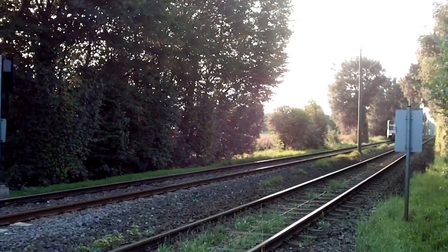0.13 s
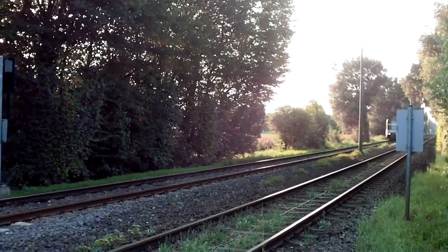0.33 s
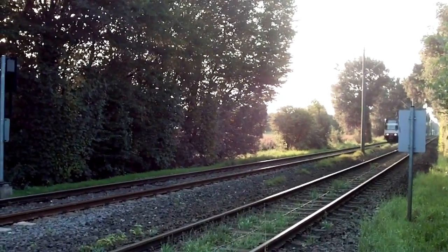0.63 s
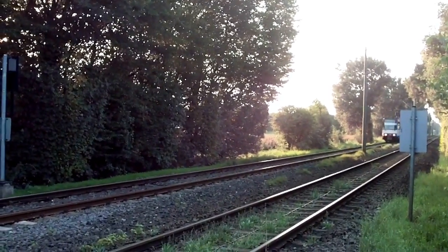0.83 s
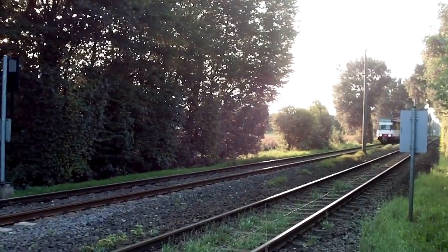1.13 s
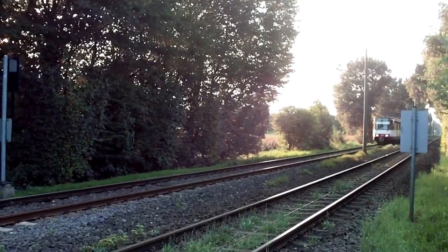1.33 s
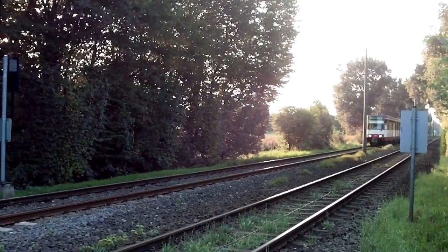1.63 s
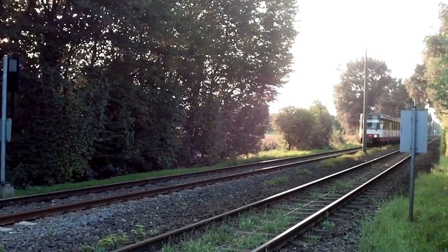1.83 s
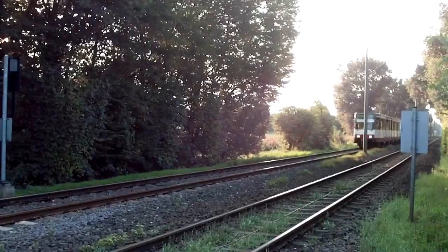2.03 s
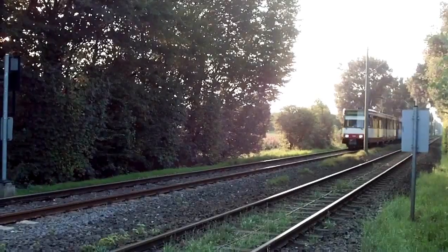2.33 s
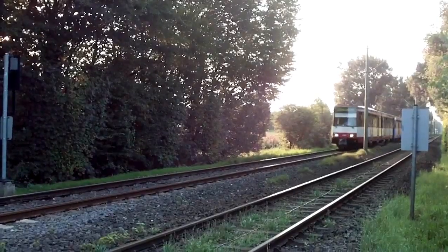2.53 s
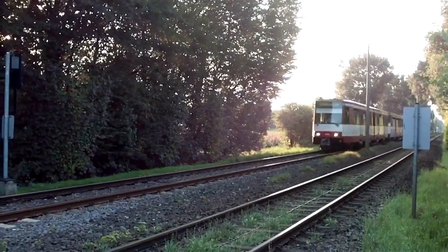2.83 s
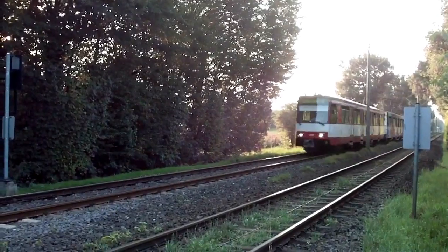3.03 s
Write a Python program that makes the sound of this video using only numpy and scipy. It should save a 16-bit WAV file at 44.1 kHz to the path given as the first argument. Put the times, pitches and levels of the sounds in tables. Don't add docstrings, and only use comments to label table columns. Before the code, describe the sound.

A light rail train approaches, never passing. From 0 to 1 s its rolling is faint over deep ground rumble, a distant engine's low idling hum and soft leafy air, with a short low boom near 0.4 s. From 1.2 s wheel roar, ringing and fluttering rail song rise quickly; a softer boom and tiny bird chirp come near 1.9 s. Overhead-wire hiss brightens, loudest at 3.2 s.

```python
import sys
import numpy as np
from scipy import signal
from scipy.fft import rfft, irfft, next_fast_len
from scipy.io import wavfile
from scipy.ndimage import uniform_filter1d

SR = 44100
rng = np.random.default_rng(int(sys.argv[2]) if len(sys.argv) > 2 else 0)


def persist_wave(psi):
    counts = np.round(np.clip(psi, -1, 1) * 32767).astype(np.int16)
    wavfile.write(sys.argv[1], SR, np.atleast_2d(counts).T)


def boost(x):
    u = np.asarray(x, float) / 20
    return 10 ** u


N = 140238


def rms_one(x):
    return x / np.sqrt(np.mean(x ** 2) + 1e-20)


def in_time(rows):
    times, values = np.transpose(rows)
    return np.interp(np.arange(N) / SR, times, values)


def swing_of(db):
    return db - db.mean()


def drift(rate_hz):
    step = 40
    r = np.exp(-2 * np.pi * rate_hz * step / SR)
    raw = rng.standard_normal(N // step + 2002)
    slow = signal.lfilter([1], [1, -2 * r, r * r], raw)[2000:]
    return np.interp(np.arange(N) / step, np.arange(len(slow)), rms_one(slow - slow.mean()))


def band(low_hz, high_hz, order):
    sos = signal.butter(order, [low_hz, high_hz], "band", fs=SR, output="sos")
    noise = rng.standard_normal(N + SR // 4)
    return rms_one(signal.sosfilt(sos, noise)[-N:])


def ring(hz, width_hz):
    return band(hz - width_hz / 2, hz + width_hz / 2, order=1)


def coloured(spectrum, patchy_db, rate_hz=6.0):
    hz, db = np.transpose(spectrum)
    knots = np.log(hz)
    size = next_fast_len(N)
    at = np.log(np.arange(size // 2 + 1) * SR / size + 1e-9)
    beyond = np.maximum(knots[0] - at, 0) + np.maximum(at - knots[-1], 0)
    gain = boost(np.interp(at, knots, db) - 40 * beyond)
    shaped = rfft(rng.standard_normal(size)) * gain
    centres = np.linspace(knots[0], knots[-1], 8)
    shared = drift(8)
    total = 0
    for one in np.eye(8):
        part = irfft(shaped * np.interp(at, centres, one), size)[:N]
        total = total + part * boost(patchy_db * (0.56 * shared + drift(rate_hz)))
    return rms_one(total)


# t/s, level/dB
NEARNESS = [
    (0, -42.5),
    (.5, -41.5),
    (1, -40.5),
    (1.5, -37),
    (2, -36),
    (2.4, -32.5),
    (2.8, -30.5),
    (3, -30),
    (3.12, -28.5),
    (3.18, -28.5),
]


def nearness():
    return in_time(NEARNESS)


# f/Hz, level/dB (per Hz)
ROAR = [(90, 3.5), (250, -13), (380, -15), (700, -7), (1500, -7.5), (2100, -13), (2900, -16), (3700, -23.5)]
# low f/Hz, high f/Hz, level/dB (over nearness), share of its swing
PASS_BANDS = [(507, 659, -8.5, 1.22), (648, 746, -11, 1.44), (782, 860, -15.5, 1.05),
              (861, 1010, -4.5, 0.91), (1002, 1154, -4, 0.91), (1206, 1290, -10.5, 0.89),
              (1938, 2170, -19.5, 1.12)]
# f/Hz, width f/Hz, level/dB (over nearness), share of its swing
WHEEL_RINGS = [(587, 30, -15, 1.1), (937, 25, -13, 1.45), (1010, 50, -15, 1.75), (1128, 30, -14, 1.0),
               (1598, 10, -25, .9), (1535, 40, -25, 1.4), (266, 20, -24, 1.5), (2965, 90, -28, 1.1),
               (2050, 40, -23, 1.0)]


def track(near_db):
    mean, swing = near_db.mean(), swing_of(near_db)
    shared = drift(36)
    roar = boost(mean - 7.5 + 1.38 * swing) * coloured(ROAR, patchy_db=1.4)
    body = boost(mean - 23 + 1.4 * swing) * band(90, 120, order=2)
    out = roar + body
    for low_hz, high_hz, db, share in PASS_BANDS:
        level = mean + db + share * swing + 0.7 * shared + 0.5 * drift(3)
        out = out + boost(level) * band(low_hz, high_hz, order=4)
    for hz, width_hz, db, share in WHEEL_RINGS:
        level = mean + db + share * swing + drift(3.5)
        out = out + boost(level) * ring(hz, width_hz)
    return out


# t/s, level/dB
RAIL_WAVES = [(0, -47), (.4, -46), (.8, -44), (1.2, -41.5), (1.5, -39), (1.9, -37.5), (2.07, -40.5),
              (2.22, -36), (2.45, -38), (2.6, -36), (2.9, -36.5), (3.18, -36.5)]


def rail_song():
    sleeper_hz, first_sleeper_s = 31.5, .0292
    depth, sharpness, evenness = .64, 1.3, .28
    turn = 2 * np.pi * sleeper_hz * (np.arange(N) / SR - first_sleeper_s)
    throb = (1 + depth * np.cos(turn)) ** sharpness
    waves = band(1302, 1412, order=5)
    power = uniform_filter1d(waves ** 2, size=SR // 30)
    waves = waves / (power + .05) ** evenness
    patchy = boost(1.0 * drift(18))
    return boost(in_time(RAIL_WAVES) + 1) * rms_one(throb * waves * patchy)


# f/Hz, level/dB (per Hz)
RUMBLE = [(12, -39), (24, 1.5), (48, -0.5), (63, -5), (85, -5), (110, -18), (170, -19.5), (400, -27.5)]


def ground_rumble(near_db):
    return boost(-38 + 0.1 * swing_of(near_db)) * coloured(RUMBLE, patchy_db=2)


# t/s, length t/s, level/dB
BOOMS = [
    (0.38, 0.081, -37),
    (1.975, 0.24, -41),
    (2.54, 0.12, -51),
]


def boom():
    centre_hz, width_hz, rest_db = 63.5, 3, -47
    t = np.arange(N) / SR
    swell = boost(rest_db)
    for start_s, length_s, db in BOOMS:
        swell = swell + boost(db) * np.exp(-((t - start_s) / length_s) ** 2)
    hz = centre_hz + width_hz * drift(2.7) / 2
    return np.sqrt(2) * swell * np.sin(2 * np.pi * np.cumsum(hz) / SR)


# f/Hz, level/dB (per Hz)
AIR = [(200, -1.5), (1500, -13), (2500, -11.5), (4000, -12.5), (6000, -16.5), (10200, -17), (10900, -20),
       (16000, -28)]


def still_air():
    return boost(-52.5) * coloured(AIR, patchy_db=0.5)


# multiple of the firing rate, level/dB
UPPER_ORDERS = [(3, -61), (5, -60), (8, -66)]


def engine():
    firing_hz, first_tick_s, pipe_lag_s, tick_s = 38.95, .0063, .008, .0035
    cycles = firing_hz * (np.arange(N) / SR - first_tick_s) + 1
    turn = 2 * np.pi * (cycles - firing_hz * pipe_lag_s) + 0.05 * drift(0.54)
    hum = boost(-35.5 + .8 * drift(7.1)) * np.cos(turn)
    hum = hum - boost(-43.5 + drift(6)) * np.sin(2 * turn)
    for multiple, db in UPPER_ORDERS:
        hum = hum + boost(db + 2 * drift(1.1)) * np.sin(multiple * turn)

    firing = np.round(cycles).astype(int)
    weak_db = -4 * (firing % 2 == 0)
    spread_db = 3 * rng.standard_normal(N)[firing]
    pulse = np.exp(-((cycles - firing) / firing_hz / tick_s) ** 2)
    clatter = band(13300, 16500, order=2) + boost(-1) * ring(14200, 300)
    ticks = boost(-72 + weak_db + spread_db) * pulse * clatter

    whirr = boost(-71 + drift(20)) * ring(12980, 330)
    return np.sqrt(2) * hum + ticks + whirr


# f/Hz, level/dB (per Hz)
HISS = [(2500, -38), (3700, -5), (6000, -5.5), (7900, -2), (10200, -1.5), (11300, -9), (13500, -28),
        (16000, -21)]
# t/s, level/dB
WIRE = [
    (0, -64),
    (.5, -61),
    (.85, -59.5),
    (1.2, -54),
    (1.55, -49),
    (1.8, -48.5),
    (2.15, -45.5),
    (2.45, -45.5),
    (2.75, -42.5),
    (3.18, -40),
]


def collector():
    db = in_time(WIRE)
    hiss = boost(db + 2.0) * coloured(HISS, patchy_db=0.5, rate_hz=36.0)
    sheen = boost(db.mean() - 9.5 + 1.26 * swing_of(db)) * band(10400, 12600, order=2)
    return hiss + sheen


def bird():
    start_s, length_s, pitch_hz, fall_hz = 1.9, .055, 4130, 70
    u = np.clip((np.arange(N) / SR - start_s) / length_s, 0, 1)
    swell = np.sin(np.pi * u ** 0.59)
    return boost(-51) * swell * np.sin(2 * np.pi * np.cumsum(pitch_hz - fall_hz * u) / SR)


def scene():
    near_db = nearness()
    train = track(near_db) + rail_song() + collector()
    ground = ground_rumble(near_db) + boom()
    mono = train + ground + still_air() + engine() + bird()
    return np.stack([mono, mono])


def roll_off(x):
    return signal.sosfilt(signal.butter(12, 15750, fs=SR, output="sos"), x)


def record(dry):
    headroom = .4
    mix = headroom * np.tanh(dry / headroom)
    return roll_off(mix)


dry = scene()
out = record(dry)
persist_wave(out)
```